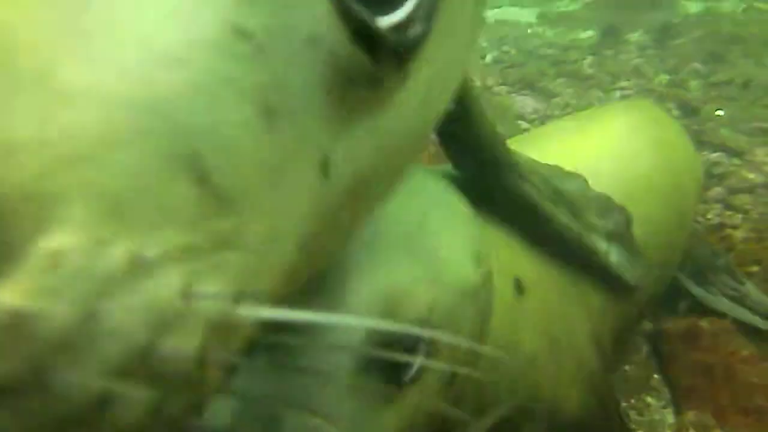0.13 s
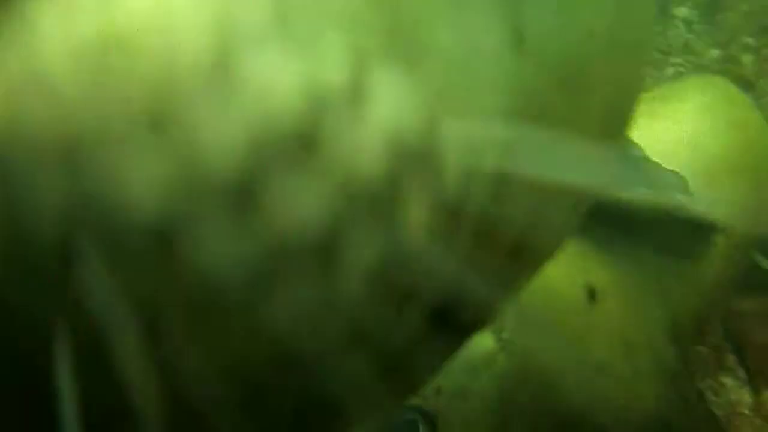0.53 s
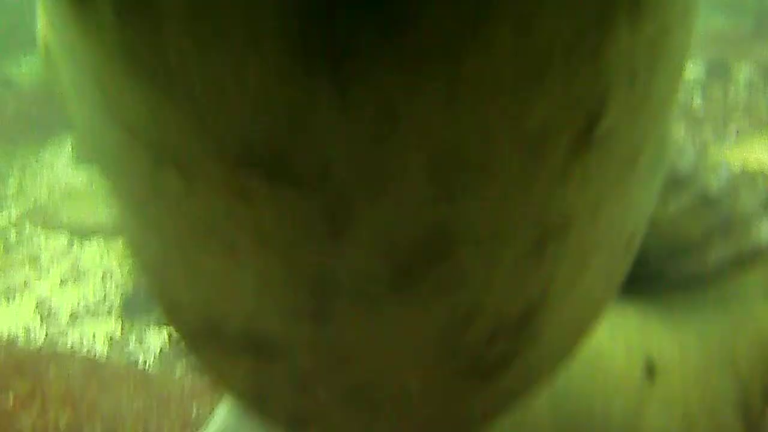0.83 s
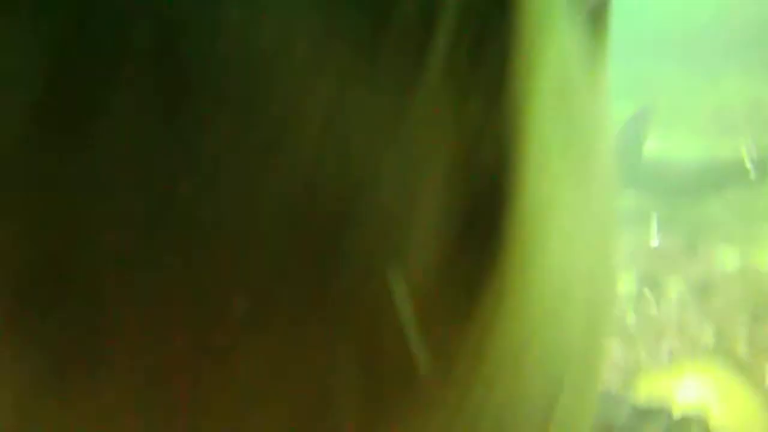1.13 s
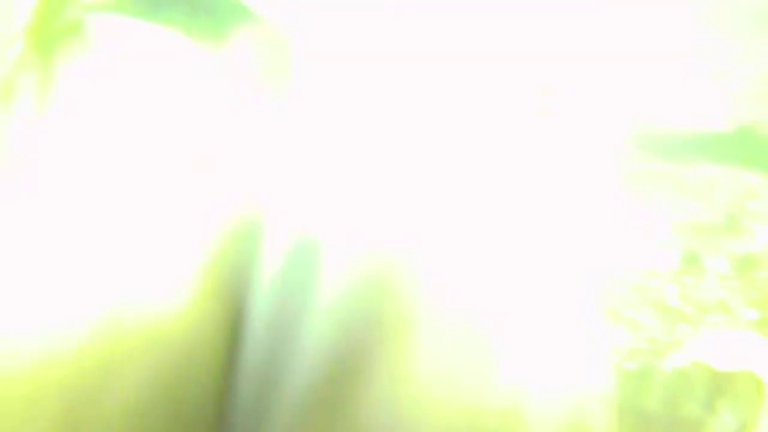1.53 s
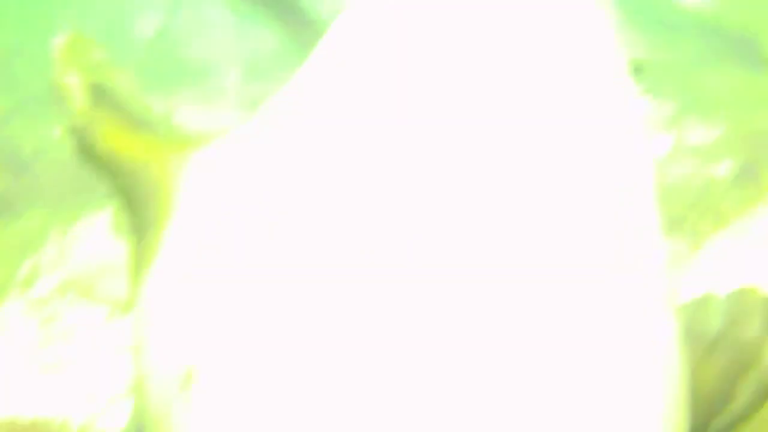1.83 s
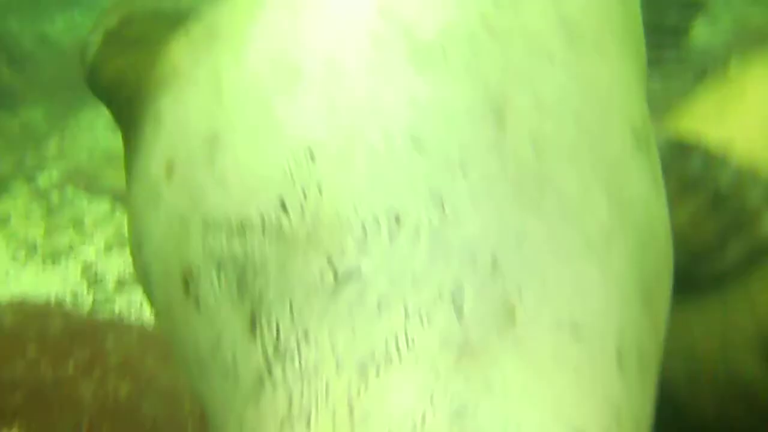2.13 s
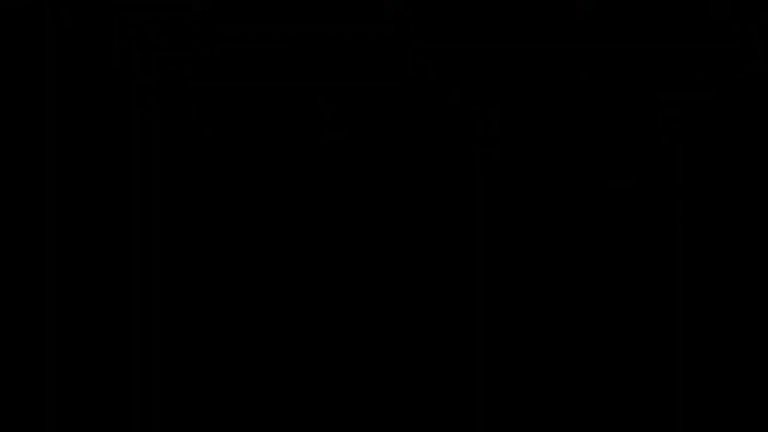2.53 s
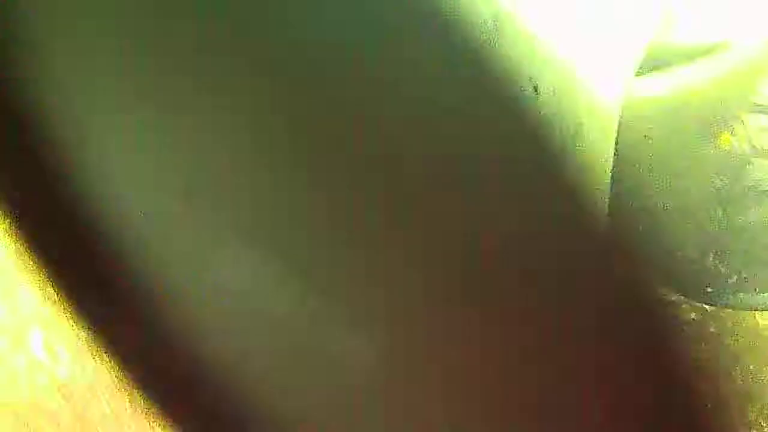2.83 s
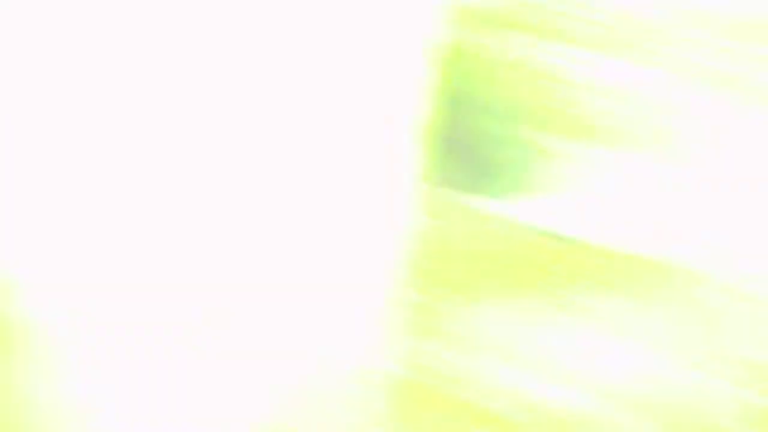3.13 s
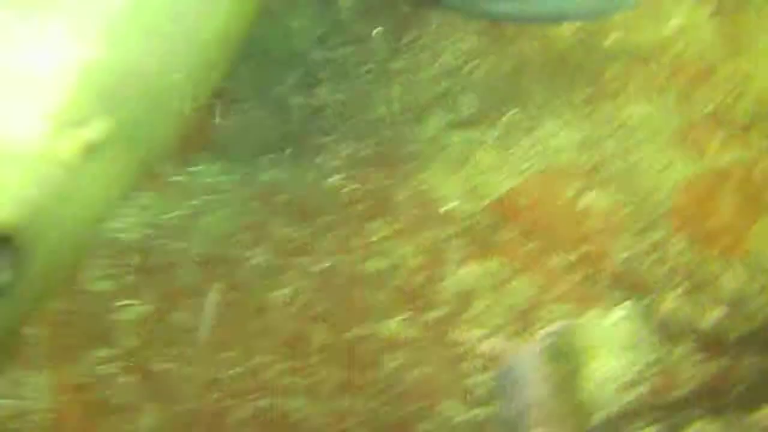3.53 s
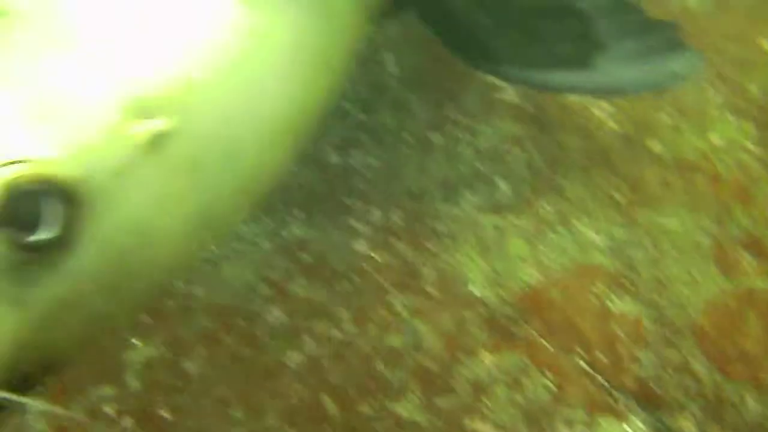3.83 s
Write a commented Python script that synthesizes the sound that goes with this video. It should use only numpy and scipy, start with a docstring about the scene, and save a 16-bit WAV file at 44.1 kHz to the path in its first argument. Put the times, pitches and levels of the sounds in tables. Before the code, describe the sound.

Knocks on a small underwater camera nudged by seals: faint crackling hiss first, then sharp clipped blows with brief squeaks, a short rasping scrape, grainy rubbing and bubble blips, heard close from inside the housing.

```python
"""Faint crackling recorder hiss for two seconds, then knocks, squeaks, one rasping scrape and rubbing.
Seals nudge a small camera under water: blows ring its housing modes, slipping skin squeaks,
fur and whiskers make trains of tiny slips, and small bubbles ring as damped tones with rising pitch.
An 8 kHz, 8-bit recorder rounds the low hiss into a crackle and clips the hardest knocks."""
import sys
import numpy as np
from scipy import signal
from scipy.fft import rfft, irfft
from scipy.io import wavfile

SR = 44100
rng = np.random.default_rng(int(sys.argv[2]) if len(sys.argv) > 2 else 0)


def to_wav(s):
    """Save 16-bit WAV."""
    ch = np.atleast_2d(s).T  # columns
    pcm = np.round(np.clip(ch, -1, 1) * 32767)  # PCM
    wavfile.write(sys.argv[1], SR, pcm.astype(np.int16))


N = 176400  # 4 s

HISS_DB = -56.5  # before rounding
BUBBLE_RISE_S, BUBBLE_GLIDE_PER_S = 0.00064, 2.1  # glide: share of the starting pitch gained per second
GRAINS_PER_S = 2200
RUMBLE_SPREAD_DB, RUSTLE_SPREAD_DB, FIZZ_SPREAD_DB, SCRAPE_SPREAD_DB = 3.5, 3.5, 4, 0
PUSH_S = 0.00049  # rise of the housing modes
RATTLE_T60_S, RATTLE_HZ = 0.041, 1367  # RATTLE_HZ: top of the rattle band, pivot of the brightness tilt
SQUEAK_SKEW = 0.52  # below 1: the swell peaks early
SQUEAK_SAG = 0.22  # pitch drop over a squeak, as a share of its nominal pitch
THUMP_DB, THUMP_S, THUMP_GROWTH = -25, 0.0012, 2.4  # level for a 0 dB knock, time to peak, dB per knock dB
BASS_CUT_HZ = 130
RECORDER_HZ, FULL_SCALE, STEPS, BIAS = 8000, 0.71, 128, -0.0098  # STEPS: per polarity
OVERLOAD_DB = -3.5  # input stage saturates here
EDGE_HZ = 16500


def amp(db):
    """Decibels to gain."""
    return 10 ** (np.asarray(db) / 20)


def unit(x):
    """Scales to rms 1."""
    return x / np.sqrt(np.mean(x ** 2) + 1e-20)


def add(mix, start_s, sound):
    """Lays a sound into the mix at start_s, cut at the end of the mix."""
    part = mix[max(round(start_s * SR), 0):][:len(sound)]
    part += sound[:len(part)]


def colour(x, points):
    """Weights the spectrum of x by a curve through (Hz, dB) points, linear in log frequency; rms 1."""
    hz, db = np.transpose(points)
    f = np.fft.rfftfreq(len(x), 1 / SR)
    gain = amp(np.interp(np.log(f + 1), np.log(hz), db))
    return unit(irfft(rfft(x) * gain, len(x)))


def thin(x):
    """Small ringing things give off little deep bass: high-pass."""
    return signal.lfilter(*signal.butter(2, BASS_CUT_HZ, "high", fs=SR), x)


def ping(t, hz, t60_s, rise_s, glide_per_s=0):
    """A damped tone with a soft start and an optional linear pitch glide."""
    rise = 1 - np.exp(-(t / rise_s) ** 2)
    decay = np.exp(-np.log(1000) * t / t60_s)
    return rise * decay * np.sin(2 * np.pi * hz * t * (1 + glide_per_s * t / 2))


def slips(lo_hz, hi_hz, spread_db, cycles, count=32):
    """Random tiny slips of skin and whiskers: short pings at count pitches, random sign and strength."""
    out, t = np.zeros(N), np.arange(2048) / SR
    for hz in np.geomspace(lo_hz, hi_hz, count):
        size = amp(spread_db * np.minimum(rng.exponential(1, N), 4))
        sign = np.sign(rng.random(N) - 0.5)
        struck = rng.random(N) < GRAINS_PER_S / count / SR
        grain = np.sqrt(hz) * ping(t, hz, 2 * cycles / hz, 0.5 / hz)
        out += signal.oaconvolve(size * sign * struck, grain)[:N]
    return unit(out)


def floor_hiss():
    """Steady low hiss: coloured noise that toggles the recorder's rounding."""
    # Spectrum of the hiss before rounding: (frequency [Hz], relative density [dB])
    hiss_colour = [(20, -7), (60, 3.5), (160, 0.5), (400, -2), (600, -2), (830, 1.5), (1250, -6),
                   (2050, -9.5), (2450, -1), (2800, -12.5), (3200, -6.5), (4000, -13.5)]
    return amp(HISS_DB) * colour(rng.standard_normal(N), hiss_colour)


def bubbles():
    """Pockets of air ring briefly, rising a little in pitch."""
    # Bubbles and gulps of water: (time [s], starting pitch [Hz], level [dB], t60 [s])
    bubble_events = [(1.815, 2454, -39.5, .025), (1.926, 184, -36, 0.038), (2.298, 283, -23.5, 0.018),
                     (2.331, 322, -29, 0.029), (2.575, 491, -36, 0.075), (2.719, 345, -29.5, 0.05),
                     (2.759, 293, -24, 0.039), (2.826, 320, -30.5, 0.038), (3.101, 577, -15, 0.11),
                     (3.131, 450, -19, 0.035), (3.167, 2570, -22, .025), (3.282, 304, -15.5, 0.022),
                     (3.370, 251, -18.5, 0.065), (3.459, 1356, -23, 0.072), (3.539, 1410, -19, 0.026),
                     (3.590, 3200, -21, 0.01), (3.706, 3520, -28, 0.017), (3.714, 301.3, -16.5, 0.027),
                     (3.775, 2694, -22, 0.026), (3.799, 216, -18, 0.036), (3.814, 342, -21, .03),
                     (3.9007, 1265, -13, 0.018), (3.915, 383, -23, 0.015), (3.982, 270, -13.5, 0.016),
                     (3.981, 2560, -19.5, 0.017)]
    out, t = np.zeros(N), np.arange(SR // 8) / SR
    for start_s, hz, db, t60_s in bubble_events:
        add(out, start_s, amp(db) * ping(t, hz, t60_s, BUBBLE_RISE_S, BUBBLE_GLIDE_PER_S))
    return thin(out)


def rubbing():
    """Fur drags over the housing: a lumpy rumble, a grainy rustle and a fine fizz of slips."""
    # Rubbing strength: (time [s], rumble level [dB], rustle level [dB], treble fizz level [dB])
    rub_levels = [(2.2, -57, -49, -49.5), (2.36, -47.5, -60, -67), (2.409, -40.5, -56.5, -52.5),
                  (2.549, -42, -45, -54), (2.62, -44, -51.5, -52.5), (2.63, -41.5, -44, -47),
                  (2.661, -40.5, -38.5, -46), (2.701, -44, -54.5, -55.5), (2.76, -39, -46, -50),
                  (2.86, -45, -51, -54.5), (2.929, -36.5, -39, -37.5), (3.04, -38, -34.5, -43),
                  (3.191, -41.5, -37.5, -37.5), (3.251, -36, -39, -38), (3.37, -37.5, -34, -40.5),
                  (3.44, -36.5, -40, -43), (3.51, -36.5, -40, -45.5), (3.632, -31.5, -35, -39),
                  (3.69, -41.5, -47, -52), (3.75, -35, -40.5, -41.5), (3.835, -37.5, -32.5, -39.5),
                  (3.87, -35, -47.5, -53.5), (3.91, -32.5, -35.5, -43), (3.965, -44.5, -49.5, -51.5),
                  (4, -38.5, -32, -37)]
    # Spectral weights of the three layers: (frequency [Hz], gain [dB])
    rumble_colour = [(25, -19), (70, -24.5), (140, -8), (230, 0.5), (330, 1), (480, -8), (700, -12.5),
                     (1200, -36)]
    rustle_colour = [(200, -40), (500, -4.5), (850, 3), (1350, 0), (1700, -8), (2300, -25.5), (4400, -47)]
    fizz_colour = [(1000, -25), (1800, -9.5), (2250, -8.5), (2600, 1.5), (2900, -9), (3700, -1.5),
                   (4400, -5.5)]
    t = np.arange(N) / SR
    time_s, rumble_db, rustle_db, fizz_db = np.transpose(rub_levels)
    rumble = colour(slips(77.5, 900, RUMBLE_SPREAD_DB, cycles=2.2), rumble_colour)
    rustle = colour(slips(400, 2300, RUSTLE_SPREAD_DB, cycles=11), rustle_colour)
    fizz = colour(slips(1380, 4570, FIZZ_SPREAD_DB, cycles=25.6), fizz_colour)
    out = amp(np.interp(t, time_s, rumble_db)) * rumble
    out += amp(np.interp(t, time_s, rustle_db)) * rustle
    out += amp(np.interp(t, time_s, fizz_db)) * fizz
    return out * (t > time_s[0])


def scrape():
    """Stiff whiskers rasp across the housing, swelling and fading: slips plus noise."""
    # One hard scrape, silent outside: (time [s], level [dB])
    scrape_levels = [(2.927, -39.5), (2.943, -19.5), (2.950, -26.5), (2.968, -20), (2.990, -17.5),
                     (3.004, -31), (3.035, -42)]
    # Scrape spectral weight: (frequency [Hz], gain [dB])
    scrape_colour = [(150, -23), (400, -18.5), (700, -25), (1100, -2), (1550, 0), (2300, 6.5), (2900, 2),
                     (3600, -0.5), (4400, -27)]
    level_db = np.interp(np.arange(N) / SR, *np.transpose(scrape_levels), left=-np.inf, right=-np.inf)
    rasp = slips(300, 4120, SCRAPE_SPREAD_DB, cycles=4.7) + 0.8 * rng.standard_normal(N)
    return amp(level_db) * colour(rasp, scrape_colour)


def squeak(t, hz, length_s):
    """Skin slipping on the housing: a short tone that swells, sags in pitch and stops."""
    u = np.minimum(t / length_s, 1)
    swell = np.sin(np.pi * u ** SQUEAK_SKEW) ** 2
    return swell * np.sin(2 * np.pi * hz * t * (1 + SQUEAK_SAG * (1 - u) / 2))


def rattle(t):
    """Dying rattle: band-limited noise under an exponential decay."""
    band = signal.butter(1, [RATTLE_HZ / 10, RATTLE_HZ], "band", fs=SR)
    grit = unit(signal.lfilter(*band, rng.standard_normal(len(t))))
    return grit * np.exp(-np.log(1000) * t / RATTLE_T60_S)


def thump(t, knock_db):
    """Low thump of lopsided overload on hard knocks: a one-sided pulse, growing faster than the knock."""
    return amp(THUMP_DB + THUMP_GROWTH * knock_db) * t / THUMP_S * np.exp(1 - t / THUMP_S)


def knocks():
    """Each blow rings the housing modes, squeaks as skin slips, rattles and thumps."""
    # Muzzle blows: (time [s], housing level [dB], brightness [dB/octave], rattle level [dB],
    #                squeak pitch [Hz], squeak level [dB], squeak length [s])
    blows = [ (0.5614, -49, 19, -54, 2350, -36, 0.0094), (2.1963, -3.5, 14, -29, 2523, -2.5, 0.0071),
             (2.4568, 6, 0.5, -9, 1277, 5, 0.0064), (2.5053, -12.5, 0, -40.5, 800, -22, 0.0048),
             (2.528, -23, 7.5, -41.5, 2540, -24, 0.0056), (2.5380, -23, 1, -47, 925, -13.5, 0.002),
             (2.9167, -13, -3.5, -30.5, 1164, -3.5, 0.0074), (2.9545, -13, 7.5, -38, 1203, -2, 0.0064),
             (2.966, -13, 4.5, -20.5, 414, -19.5, 0.014), (3.0510, 3, -1, -15, 951, 6, 0.0076),
             (3.0566, -5.5, 4.5, -14.5, 338, -19.5, 0.026), (3.094, -11, -6.5, -17, 830, -22.5, 0.015),
             (3.124, -4, 4.5, -16.5, 1301, -9, 0.0044), (3.2226, -20.5, 1.5, -30, 432, -15.5, 0.012),
             (3.3350, -19.5, 12.5, -24.5, 637, -22, .012), (3.3827, -25, 9, -32, 2854, -25, 0.014),
             (3.474, -22.5, 6.5, -23.5, 1700, -22.5, 0.0071), (3.529, -26.5, 19.5, -26.5, 2973, -13, .012),
             (3.6188, -33.5, -12, -40, 348, -22, 0.021), (3.974, -35.5, 5, -42, 2740, -34.5, .025)]
    # Housing modes: (frequency [Hz], level [dB], t60 [s])
    housing_modes = [(349.5, -17, 0.041), (585, -14.5, 0.026), (828.6, -3.5, 0.024), (935, -8, 0.022),
                     (1171, -5, 0.032), (1622, -7.5, 0.015), (1841, -13, 0.027), (2314, -8, 0.013),
                     (2572, -11.5, 0.016), (3025, -18, 0.014), (3600, -11, 0.011)]
    out, t = np.zeros(N), np.arange(SR // 6) / SR
    for start_s, db, bright_db, rattle_db, squeak_hz, squeak_db, length_s in blows:
        body = np.zeros(len(t))
        for k, (hz, mode_db, t60_s) in enumerate(housing_modes):
            tilt_db = bright_db * np.log2(hz / RATTLE_HZ)
            # neighbouring modes have opposite sign
            body += (-1) ** k * amp(db + mode_db + tilt_db) * ping(t, hz, t60_s, PUSH_S)
        ringing = body + amp(rattle_db) * rattle(t) + amp(squeak_db) * squeak(t, squeak_hz, length_s)
        add(out, start_s, thin(ringing) - thump(t, db))
    return out


def scene():
    """All contact sounds and bubbles over a steady hiss; one channel."""
    return (floor_hiss() + bubbles() + rubbing() + scrape() + knocks())[None]


def low_pass(x, hz, size):
    """Steep linear-phase low-pass with size taps."""
    return signal.oaconvolve(x, signal.firwin(size, hz, window="blackman", fs=SR)[None], "same")


def record(dry):
    """A coarse converter: low sample rate, overload, few steps, a slight offset and hard clipping."""
    step, limit = FULL_SCALE / STEPS, amp(OVERLOAD_DB)
    sampled = np.clip(signal.resample_poly(dry, RECORDER_HZ, SR, axis=1), -limit, limit)
    stepped = step * np.round((sampled + BIAS) / step)
    # interpolation filter runs at the common multiple of both rates
    smooth = signal.firwin(15001, RECORDER_HZ / 2, window=("kaiser", 10), fs=RECORDER_HZ * SR / 100)
    played = signal.resample_poly(stepped, SR, RECORDER_HZ, axis=1, window=smooth)[:, :N]
    return low_pass(np.clip(played, -FULL_SCALE, FULL_SCALE), EDGE_HZ, size=511)


dry = scene()
out = record(dry)
to_wav(out)
```